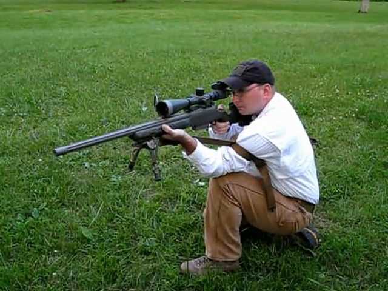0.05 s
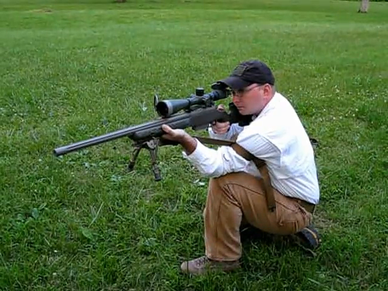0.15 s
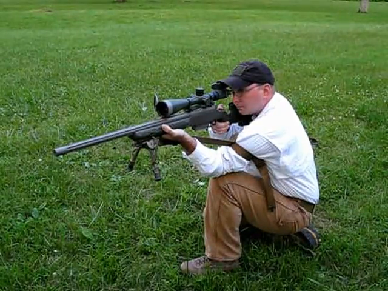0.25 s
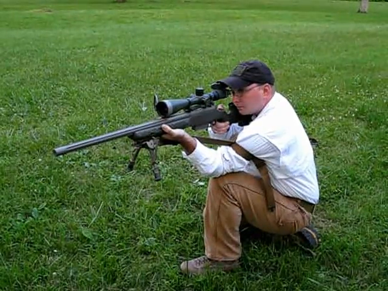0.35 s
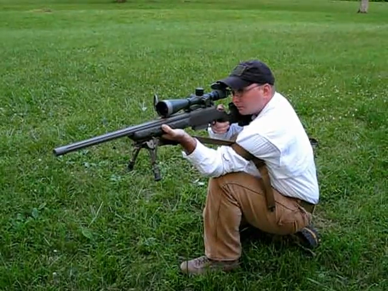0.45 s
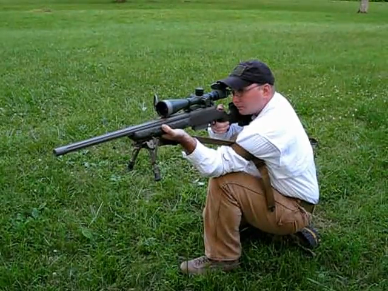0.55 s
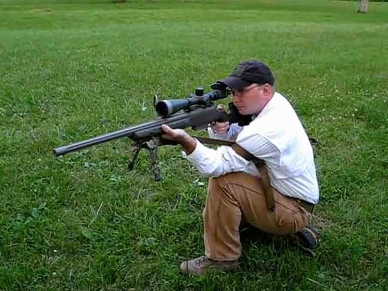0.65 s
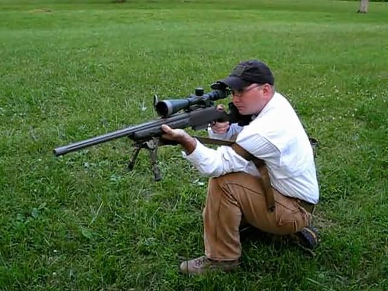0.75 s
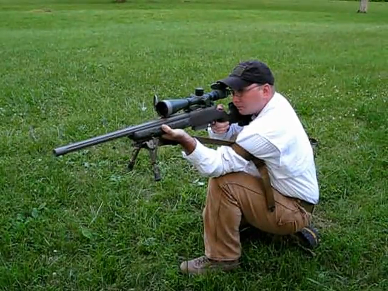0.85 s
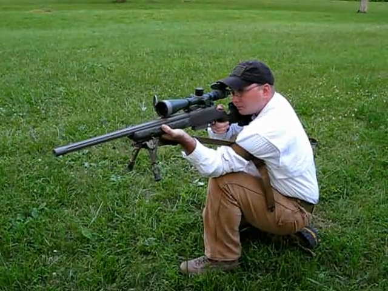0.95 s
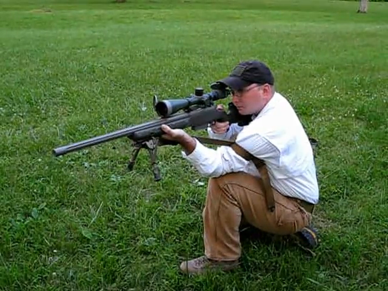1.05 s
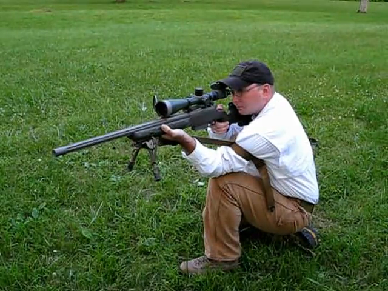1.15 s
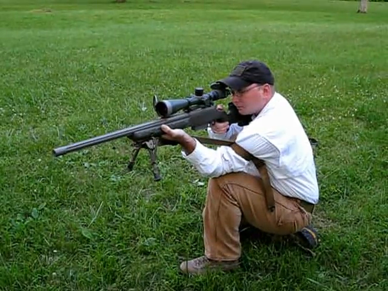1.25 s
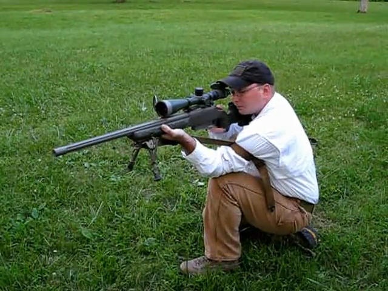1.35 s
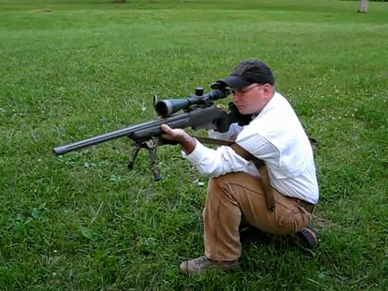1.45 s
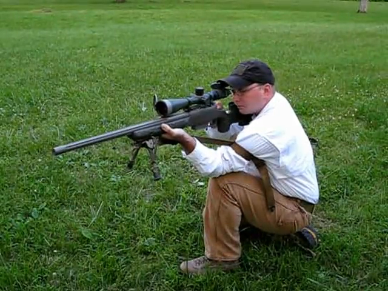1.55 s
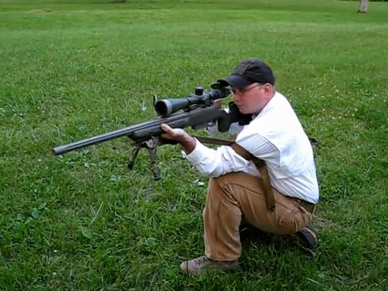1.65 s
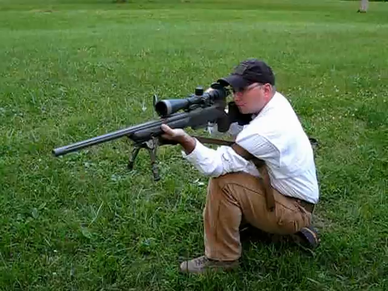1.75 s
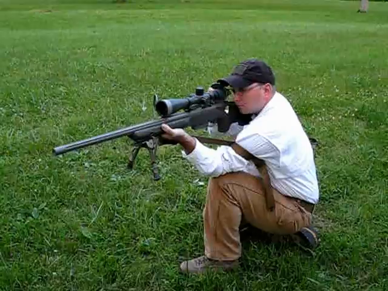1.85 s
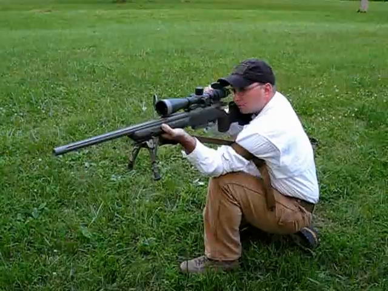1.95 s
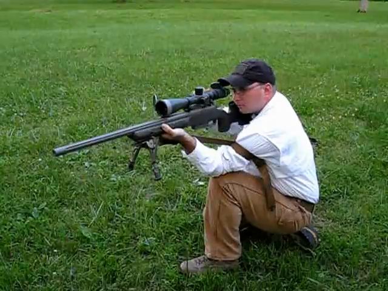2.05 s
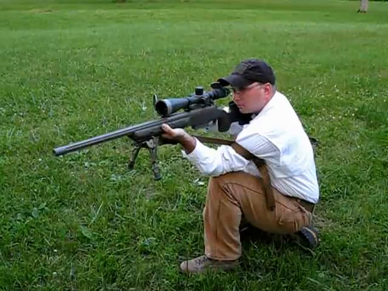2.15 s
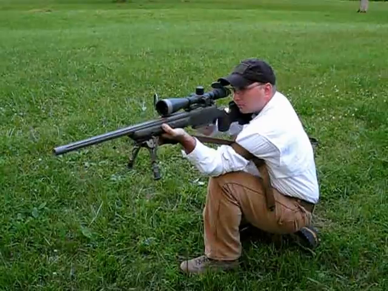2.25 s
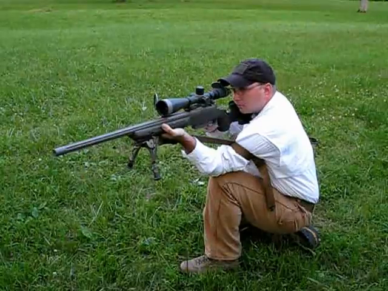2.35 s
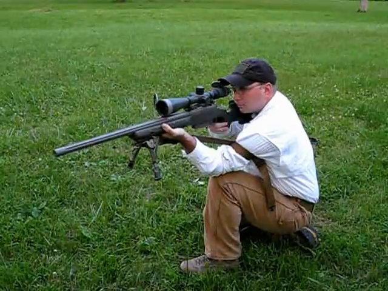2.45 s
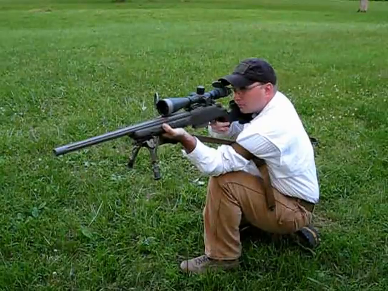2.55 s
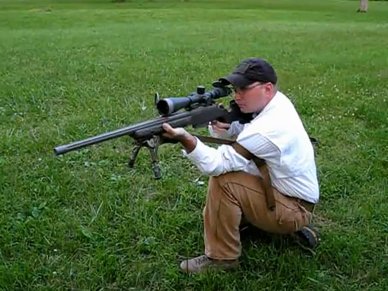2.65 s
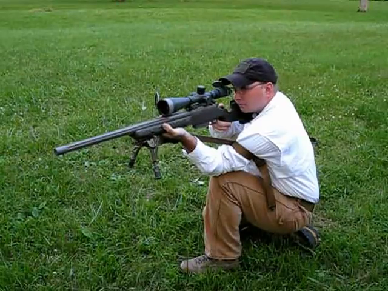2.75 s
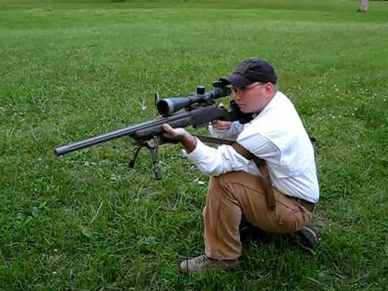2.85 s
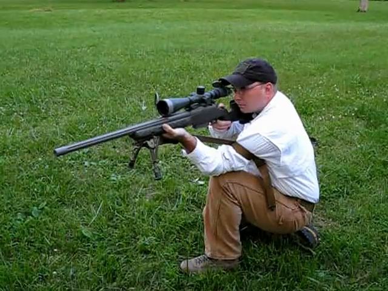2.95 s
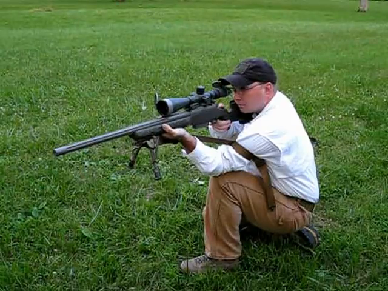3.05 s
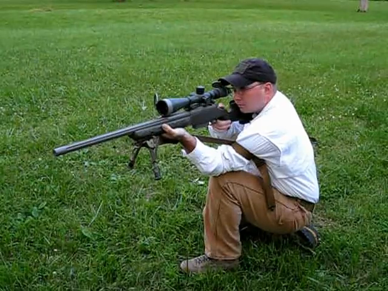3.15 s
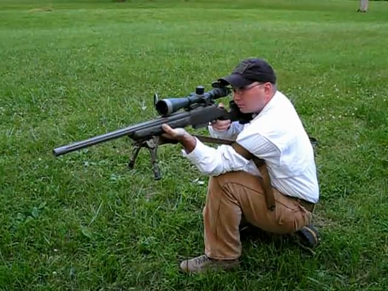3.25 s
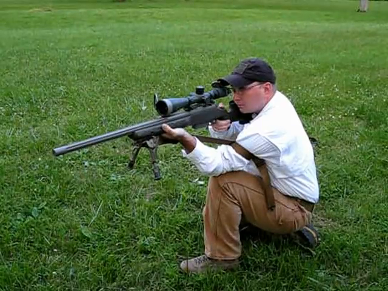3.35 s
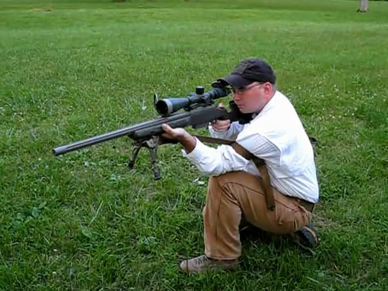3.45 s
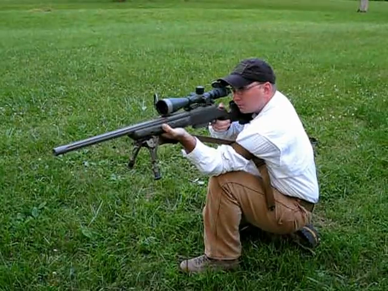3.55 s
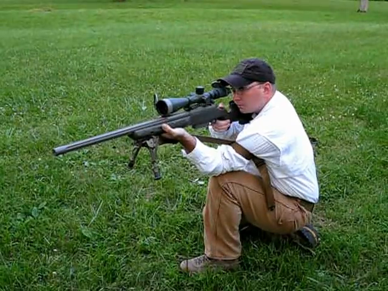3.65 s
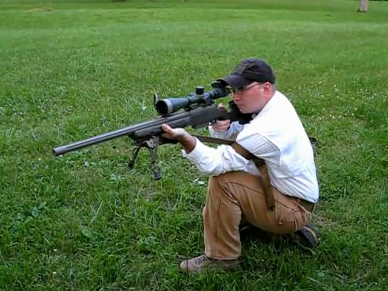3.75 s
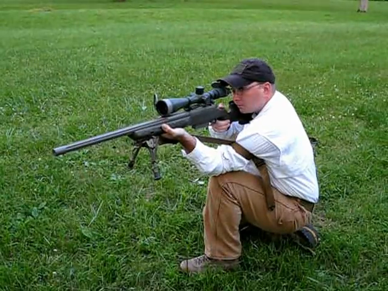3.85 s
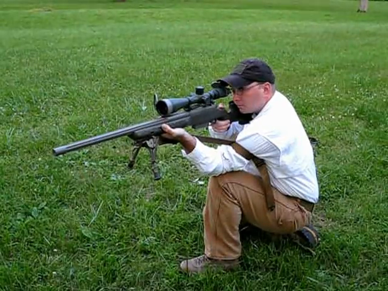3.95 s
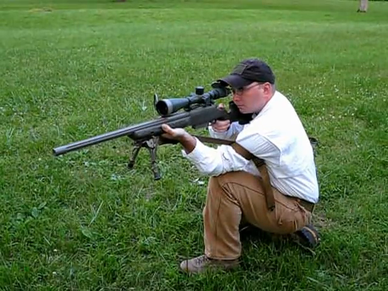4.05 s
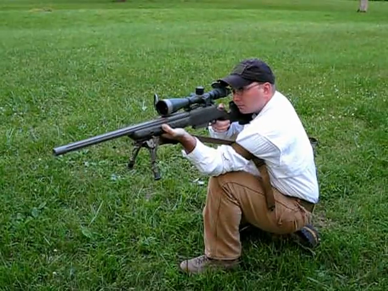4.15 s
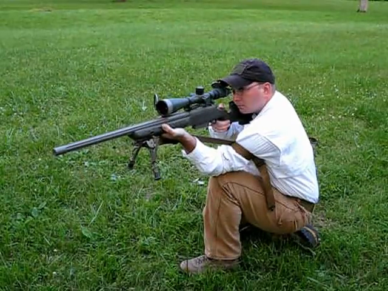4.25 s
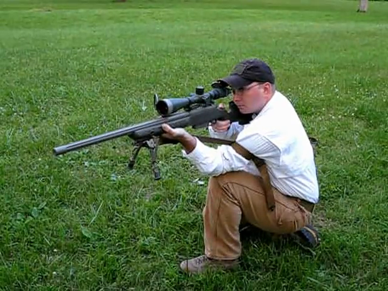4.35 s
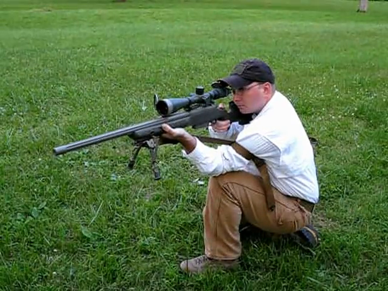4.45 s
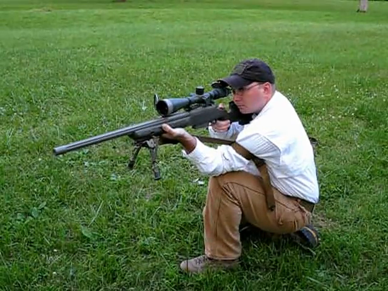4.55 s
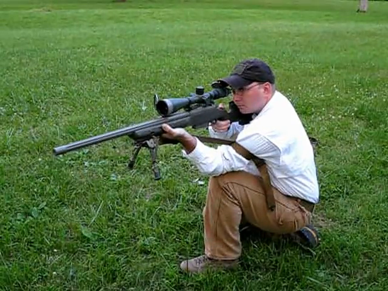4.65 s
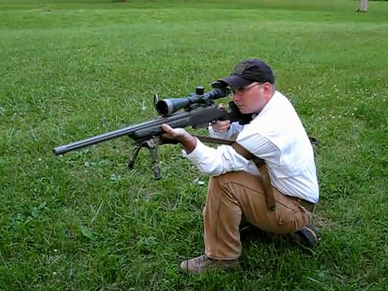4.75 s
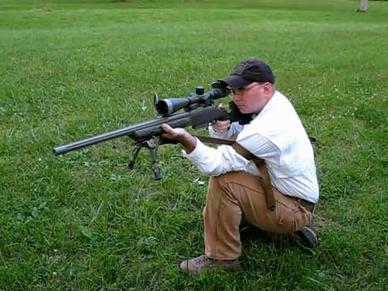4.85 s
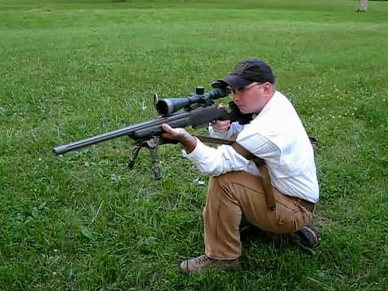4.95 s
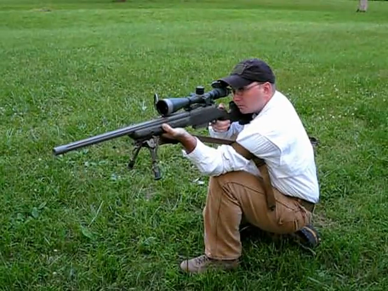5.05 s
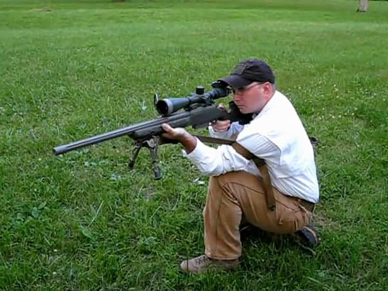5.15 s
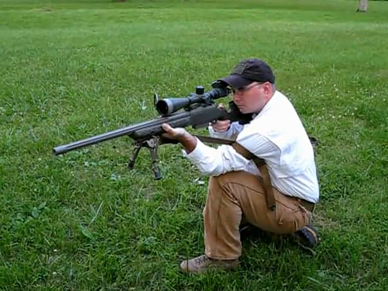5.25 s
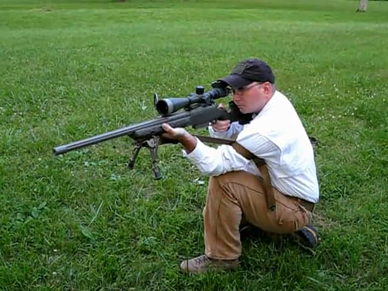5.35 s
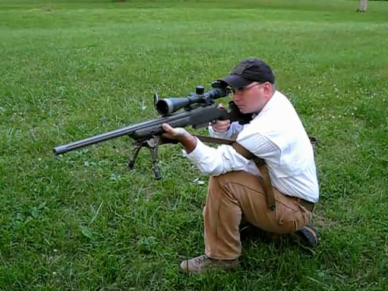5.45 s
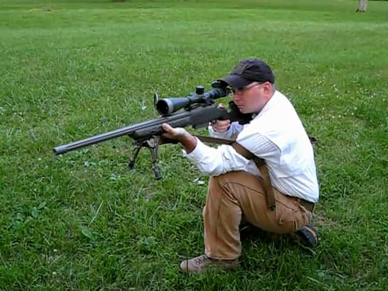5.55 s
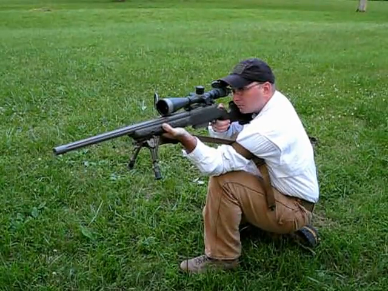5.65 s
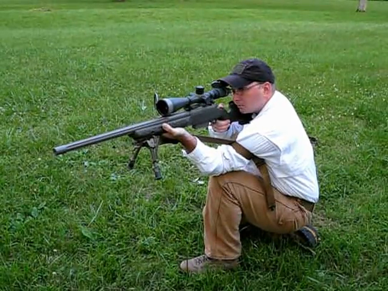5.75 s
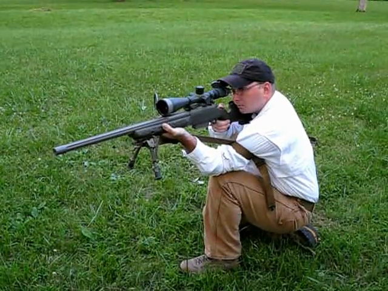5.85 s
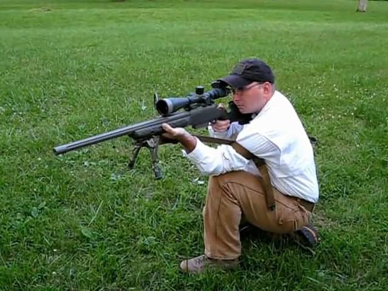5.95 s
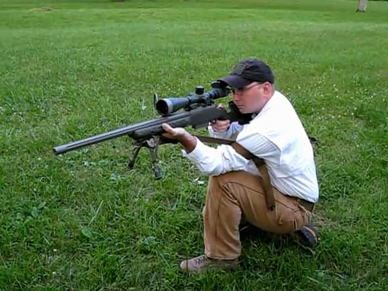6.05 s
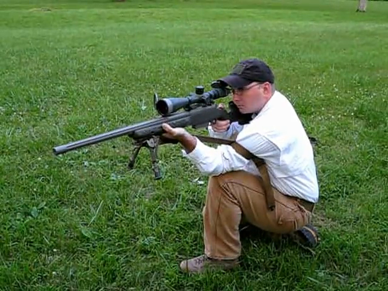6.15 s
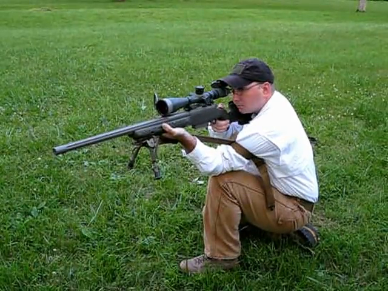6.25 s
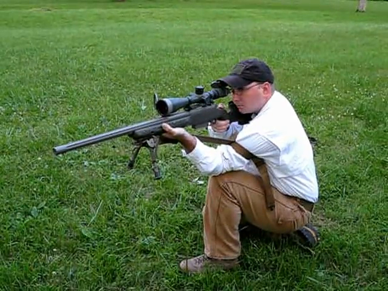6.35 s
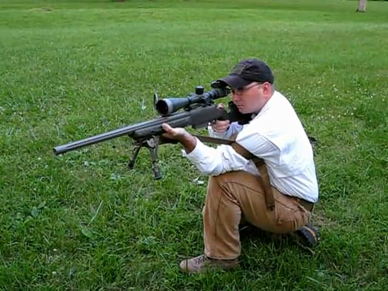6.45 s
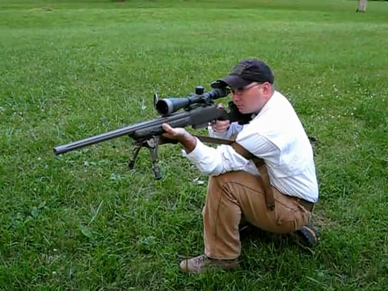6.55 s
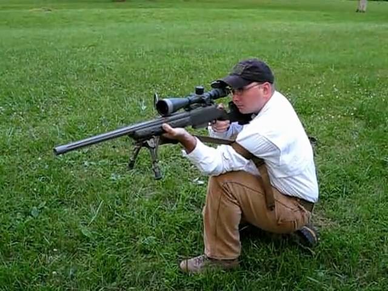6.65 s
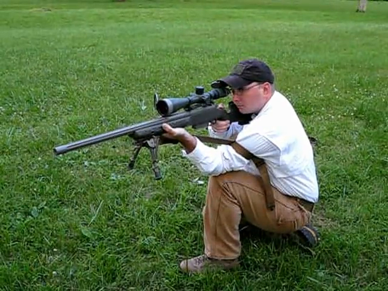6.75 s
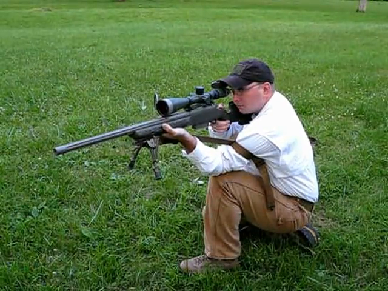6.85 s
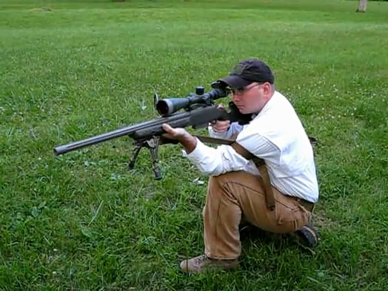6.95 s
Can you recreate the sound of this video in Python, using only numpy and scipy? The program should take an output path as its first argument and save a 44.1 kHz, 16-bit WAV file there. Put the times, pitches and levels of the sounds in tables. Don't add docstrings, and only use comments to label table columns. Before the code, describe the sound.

Outdoors on open grass, soft road hush, a thin high trill and faint bird whistles. At about one second a hard dry steel click snaps close to the microphone, with no gunshot. Shortly after, the bolt is lifted, drawn back, shoved forward and locked in a quick run of metallic clacks and short scrapes, with a faint echo from trees. Then only birds, road and a distant engine remain.

```python
import sys
import numpy as np
from scipy import signal
from scipy.fft import irfft
from scipy.io import wavfile
from scipy.ndimage import uniform_filter1d

SR = 44100
rng = np.random.default_rng(int(sys.argv[2]) if len(sys.argv) > 2 else 0)


def gain_from_db(level_db):
    decades = np.asarray(level_db, float) / 20
    return 10 ** decades


def bounce(signal):
    frames = np.transpose(np.atleast_2d(signal))
    limited = np.clip(frames, -1, 1)
    pcm = np.round(limited * 32767).astype(np.int16)
    wavfile.write(sys.argv[1], SR, pcm)


N = 308259


def evened(x):
    return x / np.sqrt(np.mean(x ** 2) + 1e-20)


def unit(x):
    return x / np.linalg.norm(x)


def smooth_noise(size):
    return evened(uniform_filter1d(rng.standard_normal(N), size=size))


def read(points, hz):
    f, value = np.transpose(points)
    return np.interp(np.log(hz + 1), np.log(f + 1), value)


def add(mix, s, sound):
    part = mix[round(s * SR):][:len(sound)]
    part += sound[:len(part)]


def coloured(points, patchy_db):
    real, imaginary, patches = rng.standard_normal((N // 512 + 6, 1025, 3)).T
    patches = uniform_filter1d(patches, size=20, axis=0)
    patches = evened(uniform_filter1d(patches, size=8, axis=1))
    spectrum_db = read(points, np.fft.rfftfreq(2048, 1 / SR))[:, None]
    z = (real + 1j * imaginary) * gain_from_db(spectrum_db + patchy_db * patches)
    return evened(signal.istft(z, nperseg=2048, noverlap=1536)[1][:N])


# frequency in Hz, density in dB per Hz.
ROAD_SPECTRUM = [(18, -44), (30, -33), (60, -10), (86, -4.5), (163, -7.5), (432, -8), (593, -7),
                 (814, -2.5), (1000, -1), (1890, -9.5), (2530, -11.5), (4070, -17.5), (12300, -26.5),
                 (15200, -33), (16500, -30)]
# time in seconds, level in dB.
ROAD_LEVEL = [(0, -46.5), (1.0, -47), (1.9, -44.5), (2.3, -46.5), (4.0, -47), (5.8, -47.5), (6.99, -48)]


def road():
    level_db = np.interp(np.arange(N) / SR, *np.transpose(ROAD_LEVEL)) + 2.5
    return gain_from_db(level_db) * coloured(ROAD_SPECTRUM, patchy_db=0.0)


ENGINE_ORDERS = [3, 4, 5, 6, 7, 8, 10, 12]
# level in dB before the shift, level in dB after.
ORDER_LEVELS = [(-30, -8), (-5.5, -3.5), (-18, -19), (0, -5), (-15, -22), (-21, -14), (-13, -12), (-9, -19)]
# time in seconds, level in dB.
ENGINE_LEVEL = [(0, -81), (.6, -62.5), (2.4, -65.5), (3.5, -57.5), (4.6, -57), (5.8, -63.5), (5.9, -68),
                (6.65, -58), (6.99, -58)]


def engine():
    idle_hz, climb_hz_per_s, climb_sag, shifted_hz = 86.4, 6.2, 0.19, 107.7
    shift_s, shift_length_s = 5.8, 0.1
    t = np.arange(N) / SR
    shifted = np.clip((t - shift_s) / shift_length_s, 0, 1)
    climb_hz = idle_hz + climb_hz_per_s * t - climb_sag * t ** 2
    turns = np.cumsum(climb_hz + (shifted_hz - climb_hz) * shifted) / SR / 6
    wobble = rng.standard_normal((len(ORDER_LEVELS), N // 441 + 1))
    wobble = evened(uniform_filter1d(wobble, size=25, axis=1))
    wobble_s = np.arange(wobble.shape[1]) / 100
    tones = np.zeros(N)
    for order, (before_db, after_db), drift in zip(ENGINE_ORDERS, ORDER_LEVELS, wobble):
        order_db = before_db + (after_db - before_db) * shifted + 2.0 * np.interp(t, wobble_s, drift)
        tones += gain_from_db(order_db) * np.sin(2 * np.pi * order * turns)
    return np.sqrt(2) * gain_from_db(np.interp(t, *np.transpose(ENGINE_LEVEL))) * tones


# start in seconds, length in seconds, centre in Hz, level in dB.
TRILL_RUNS = [(0.126, 0.27, 7400, -62.5), (.40, 0.15, 7350, -63.5), (0.601, 0.13, 7200, -65),
              (0.888, 0.14, 7500, -66), (3.03, 0.15, 7380, -61.5), (3.976, 0.13, 7400, -68),
              (4.35, 0.092, 7310, -66), (5.95, .1, 7410, -69)]


def trill(rate_hz=45, sweep_hz=900):
    out = np.zeros(N)
    uneven = smooth_noise(600)
    for s, length, hz, db in TRILL_RUNS:
        drift = uneven[round(s * SR):][:round(length * SR)]
        cycle = np.cumsum(rate_hz * (1 + 0.3 * drift)) / SR % 1
        pitch = hz + sweep_hz * (cycle - 0.5) + 150 * drift
        chips = np.sin(np.pi * cycle) ** 2 * np.sin(2 * np.pi * np.cumsum(pitch) / SR)
        add(out, s, gain_from_db(db) * evened(chips) * signal.windows.tukey(len(drift), 0.4))
    return out


def whistle(hz, db, edge_s=0.0055):
    shape = signal.windows.tukey(len(hz), min(2 * edge_s * SR / len(hz), 1))
    return np.sqrt(2) * gain_from_db(db) * shape * np.sin(2 * np.pi * np.cumsum(hz) / SR)


# start in seconds, length in seconds, settled pitch in Hz, drop in Hz, level in dB.
BIRD_HOOKS = [(.877, .026, 2400, 370, -52), (.97, .025, 2040, 150, -49), (1.374, 0.03, 2840, 151, -47.5),
              (1.91, 0.054, 2885, 500, -42.5), (1.946, .028, 2276, 150, -45.5),
              (2.629, 0.05, 2840, 290, -49.5), (2.676, 0.032, 2255, 333, -44.5),
              (2.735, 0.041, 2130, 300, -58), (3.546, 0.053, 2236, 300, -45.5),
              (3.701, 0.14, 2612, 220, -55.5), (4.2, 0.058, 2800, 418, -51.5),
              (5.072, 0.077, 2613, 100, -56.5), (5.18, 0.03, 2700, 438, -46.5),
              (6.304, 0.06, 2790, 302, -50.5), (6.381, 0.135, 2180, 375, -50),
              (6.942, 0.046, 2460, 170, -49)]
# start in seconds, length in seconds, start pitch in Hz, end pitch in Hz, level in dB.
BIRD_SLURS = [(0.745, 0.068, 3660, 2873, -45.5), (3.152, 0.029, 3550, 2550, -44.5),
              (4.261, 0.028, 2460, 2180, -48), (4.71, 0.036, 3450, 2410, -46.5),
              (5.225, 0.0345, 2475, 2200, -50), (6.215, 0.078, 3440, 2470, -46)]
# start in seconds, length in seconds, start pitch in Hz, end pitch in Hz, level in dB.
BIRD_TICK = (.351, .016, 5200, 8500, -57)
# start in seconds, length in seconds, start pitch in Hz, level in dB.
BIRD_FLICKS = [(.295, .043, 2880, -59), (.395, .04, 2620, -57), (0.847, 0.036, 2450, -55),
               (1.991, 0.04, 2470, -46), (2.578, 0.03, 2920, -50), (2.74, 0.043, 3200, -60),
               (3.534, 0.021, 2830, -47.5), (4.158, .025, 2895, -50), (5.15, 0.047, 2950, -51.5),
               (5.741, 0.026, 2398, -46), (5.84, 0.048, 2297, -51)]
# start in seconds, length in seconds, pitch in Hz, level in dB.
BIRD_HELD = [(.812, 0.026, 2890, -54), (.90, .03, 2070, -57), (.95, .035, 2700, -56),
             (1.416, 0.049, 2646, -52), (1.472, 0.044, 2597, -49), (3.665, 0.1, 3160, -51.5),
             (4.25, 0.02, 2490, -48), (4.3, .035, 2350, -54), (5.207, 0.025, 2500, -48),
             (5.665, .02, 2950, -59), (6.28, 0.019, 2477, -48), (6.901, 0.02, 3430, -53.5)]
# delay in seconds, level in dB.
BIRD_BRANCHES = [(0, 0), (.0027, -9), (.0064, -11), (.0113, -14)]


def songbird(flutter_db=1.3):
    settle_s, flick_hz_per_s = 0.0181, 5870
    shoulder, swell_db = 0.53, -9
    out = np.zeros(N)
    for s, length, hz, drop_hz, db in BIRD_HOOKS:
        t = np.arange(0, length, 1 / SR)
        add(out, s, whistle(hz + drop_hz * np.exp(-t / settle_s), db))
    for s, length, start_hz, end_hz, db in BIRD_SLURS:
        u = np.linspace(0, 1, round(length * SR))
        fall = u + shoulder * ((1 - np.cos(np.pi * u)) / 2 - u)
        add(out, s, whistle(start_hz + (end_hz - start_hz) * fall, db + swell_db * (1 - u) ** 2))
    s, length, start_hz, end_hz, db = BIRD_TICK
    add(out, s, whistle(np.linspace(start_hz, end_hz, round(length * SR)), db))
    for s, length, hz, db in BIRD_FLICKS:
        add(out, s, whistle(hz + flick_hz_per_s * np.arange(0, length, 1 / SR), db))
    for s, length, hz, db in BIRD_HELD:
        add(out, s, whistle(np.full(round(length * SR), hz), db))
    flutter = evened(uniform_filter1d(smooth_noise(300), size=300))
    taps = np.zeros(SR // 20)
    for s, db in BIRD_BRANCHES:
        taps[round(s * SR)] = gain_from_db(db)
    return signal.fftconvolve(out * gain_from_db(flutter_db * flutter), unit(taps))[:N]


# frequency in Hz, 60 dB decay time in seconds.
TREE_DECAY = [(500, 0.33), (2000, 0.9), (5000, 0.84), (10000, 0.49), (16000, 0.44)]


def trees(x, arrive, swell, longer=1):
    hz, t, z = signal.stft(rng.standard_normal(SR), SR, nperseg=256)
    late = np.maximum(t - arrive, 0)
    decay_s = longer * read(TREE_DECAY, hz)[:, None]
    z = z * (1 - np.exp(-late / swell)) * gain_from_db(-60 * late / decay_s)
    return signal.fftconvolve(x, unit(signal.istft(z, SR, nperseg=256)[1]))[:N]


def scatter(x, t60=0.042):
    t = np.arange(4000) / SR
    tail = rng.standard_normal(len(t)) * gain_from_db(-60 * t / t60) * (1 - np.exp(-t / 0.0008))
    tail = signal.lfilter(*signal.butter(1, 3500, fs=SR), tail)
    return signal.fftconvolve(x, unit(tail))[:N]


# start in seconds, hardest moment in seconds, end in seconds, level in dB.
BOLT_SLIDES = [
    (1.663, 1.724, 1.81, -38.5),
    (1.88, 1.92, 2.12, -43.5),
    (2.138, 2.201, 2.24, -39),
]
# frequency in Hz, density in dB per Hz.
SCRAPE_SPECTRUM = [(500, -31), (1500, -17), (3000, 0), (6000, 0.5), (10000, -2), (16000, -10)]


def bolt_scrape():
    t = np.arange(N) / SR
    stroke = np.zeros(N)
    for *times, db in BOLT_SLIDES:
        push_db = np.interp(t, times, [-9, 0, -24], left=-np.inf, right=-np.inf)
        stroke += gain_from_db(db + push_db)
    return stroke * coloured(SCRAPE_SPECTRUM, patchy_db=-1.5)


# start in seconds, pitch in Hz, level in dB, 60 dB
# decay time in seconds.
FREE_RINGS = [
    (1.0505, 1120, -15, .025),
    (1.646, 2250, -20, .03),
    (2.3035, 710, -22.5, 0.028),
    (2.128, 1230, -19, .03),
    (2.306, 2700, -32, .25),
    (2.3035, 1780, -14, .025),
    (2.3035, 7150, -25, .02),
]


def free_rings():
    out = np.zeros(N)
    t = np.arange(SR // 4) / SR
    for s, hz, db, t60 in FREE_RINGS:
        onset = 1 - np.exp(-t / 0.0005)
        add(out, s, gain_from_db(db - 60 * t / t60) * onset * np.sin(2 * np.pi * hz * t))
    return out


def ringing(parts, widen, phase):
    t = np.arange(1300) / SR
    ring = np.zeros(len(t))
    for (hz, width, db), turn in zip(parts, phase):
        width = width + 150
        decay = np.exp(-np.pi * widen * width * t)
        ring += gain_from_db(db) * np.sqrt(width) * decay * np.cos(2 * np.pi * (hz * t + turn))
    return unit(ring)


def blurred(parts, widen=0.91, between_db=-18):
    hz = np.fft.rfftfreq(1300, 1 / SR)
    power = sum(gain_from_db(2 * db) / (1 + (2 * (hz - f) / (widen * (width + 150))) ** 2) for f, width, db in parts)
    treble = hz ** 2 / (hz ** 2 + 1200 ** 2)
    return np.fft.fftshift(irfft(np.sqrt(power + gain_from_db(2 * between_db)) * treble))


def blow_sound(ms, treble_db, parts, top_hz):
    t = np.arange(1300) / SR
    low = signal.butter(2, 6000, fs=SR, output="sos")
    thin = signal.butter(1, 900, "high", fs=SR, output="sos")
    small = signal.butter(4, 720, "high", fs=SR, output="sos")
    noise, phase = rng.standard_normal(len(t)), rng.random(len(parts))
    u = t / (ms / 1000)
    contact = noise * (1 - np.exp(-u / 0.2)) * np.exp(-1.5 * u ** 1.3)
    direct = signal.fftconvolve(contact, ringing(parts, 0.78, phase))[:len(t)]
    direct = signal.sosfilt(small, direct + signal.sosfilt(thin, contact))
    direct = signal.sosfilt(signal.butter(3, top_hz, fs=SR, output="sos"), direct)
    body = signal.sosfilt(low, direct)
    return unit(body + gain_from_db(treble_db - 1.5) * (direct - body))


def step(near, away, blows, parts, away_parts, echo_db, push_db, top_hz):
    energy = 0
    for s, db, ms, treble_db in blows:
        size = gain_from_db(db) * np.sqrt(ms / 1000 * SR)
        energy += size ** 2
        add(near, s, size * blow_sound(ms, treble_db, parts, top_hz))
    hardest = max(blows, key=lambda blow: blow[1])[0]
    add(away, hardest, np.sqrt(energy) * gain_from_db(echo_db) * unit(blurred(away_parts)))
    jolt = np.arange(1300) / SR / 0.00025
    add(near, hardest, gain_from_db(push_db) * jolt * np.exp(1 - jolt))


# frequency in Hz, width in Hz, level in dB.
PIN_FALLS = [
    [(1.0472, -14, 2.9, 11), (1.0492, -2.5, 1.86, -4), (1.0512, 4, 1.27, 3), (1.0555, -21, 2.4, 3), (1.060, -23, 3.2, -4), (1.065, -25, 11, 0)],
    [(1864, 61, 1), (3460, 120, 5.5), (4800, 200, -16), (5370, 230, 4.5), (7030, 180, -5), (8130, 57, -5), (11280, 1000, -4), (13850, 370, 3.5), (15200, 150, -15)],
]
BOLT_LIFTED = [
    [(1.6393, -21, 1, -20), (1.6402, -12, 2.6, -16), (1.6432, -20, 1.4, -18), (1.6455, -9, 3.2, -6.5), (1.6512, -12, 3.1, 12), (1.654, -17, 2.2, -3), (1.6562, -18, 2.6, -3), ],
    [(1720, 26, -9), (2800, 500, 0.5), (5220, 130, -5.5), (7200, 130, -11), (8300, 150, -13), (9500, 330, -13), (11040, 140, -11), (12900, 330, -8), (14800, 120, -21)],
]
BOLT_DRAWN = [
    [(1.7135, -15, 1.96, -0.5), (1.717, -22, 2, -10), (1.720, -28, 1.4, -14), (1.7228, -34, 4.2, -20), (1.740, -32.5, 7.2, -12), (1.7445, -34, 4.2, -18), (1.7648, -35, 5.5, -18), ],
    [(1670, 67, -4), (3080, 330, 3.5), (4630, 260, 2), (7260, 210, -1), (9500, 160, -14), (10200, 330, -6), (13000, 210, -21), (14500, 150, -18)],
]
BOLT_STOPPED = [
    [(1.854, -16.5, 4.3, 3.5), (1.8556, -5, 0.71, -1.5), (1.8568, -13, 1.7, -6), (1.864, -29.5, 10, -4), (1.8822, -28, 2.1, 11), (1.885, -30, 3.8, -7), (1.8975, -34, 4.3, -5), (1.9945, -36.5, 3.35, -19)],
    [(1130, 340, 3.5), (2720, 210, 2), (4200, 130, -8), (5050, 250, -0.5), (6430, 220, -10), (8700, 77, -15), (10860, 170, -3), (14500, 240, 0.5), (13800, 340, -4)],
]
BOLT_PUSHED = [
    [(2.0855, -41, 4.5, -7), (2.0925, -37, 3.0, 0), (2.0982, -31, 6.6, -8), (2.1045, -36, 3.5, -15), (2.119, -35, 5.5, -30), (2.1264, -16, 3, 3), (2.1276, -0.5, 2.23, -3.5), (2.1322, -7, 0.73, -14), (2.136, -32, 4.4, -7)],
    [(2720, 690, 10), (3270, 220, 4.5), (3930, 120, 7), (4900, 96, -2), (6000, 240, 7), (6960, 880, 13.5), (10000, 630, 6), (12270, 290, 7), (13500, 370, -15)],
]
BOLT_CLOSED = [
    [(2.2112, -28, 3.3, -13), (2.2136, -16, 3, -18), (2.2198, -22.5, 2.3, -18), (2.2226, -19.5, 1.8, -15), (2.2252, -22, 1.2, -17), (2.228, -32, 2.8, -22), (2.2468, -28, 2.6, -10), (2.2522, -16, 1.44, -18)],
    [(1790, 47, -1), (2070, 76, -1.5), (2600, 110, 3.5), (3030, 28, 4.5), (4850, 78, -0.5), (5950, 49, -5), (8810, 46, -24), (10200, 48, -24)],
]
BOLT_LOCKED = [
    [(2.3022, -27, .8, -10), (2.3029, -3, 1.4, -2), (2.3042, -3.5, .8, -5), (2.3062, -19, 2.4, -8), (2.310, -38, 8, 6)],
    [(894, 230, -6), (2750, 270, 0), (3370, 320, -2), (4080, 180, -4), (5210, 180, -2), (7240, 280, -5), (8650, 320, -19), (10100, 170, -17), (13100, 230, -15)],
]
# frequency in Hz, width in Hz, level in dB.
PIN_TO_TREES = [(2700, 400, -10), (3900, 340, -1), (5270, 500, -4.5), (7100, 700, -9), (8260, 700, -8.5),
                (10850, 900, -3), (13900, 500, -6)]
LOCK_TO_TREES = [(2650, 280, -4), (3720, 500, -5), (5450, 250, 0), (7200, 770, -6), (10500, 1600, -9)]
# ring in Hz, ring level in dB, dull push level in dB.
STOCK_RINGS = [
    (1210, 1, -42),
    (840, -8.5, -43),
    (900, 1, -39),
    (1090, -25, -22),
    (1143, 1.5, -19),
    (740, -5.5, -35),
    (880, -12, -56),
]
ECHO_SHARE = [-20, -30, -25, -26.5, -30, -23, -26.5]
SMEAR_SHARE = [-19, -20, -17, -16, -19, -17, -24]
STEP_TOP = [19000, 14500, 12500, 19000, 12500, 11500, 19000]


def rifle():
    near, away, loose = np.zeros((3, N))
    steps = PIN_FALLS, BOLT_LIFTED, BOLT_DRAWN, BOLT_STOPPED, BOLT_PUSHED, BOLT_CLOSED, BOLT_LOCKED
    to_trees = [PIN_TO_TREES] + [parts for blows, parts in steps[1:-1]] + [LOCK_TO_TREES]
    settings = zip(steps, STOCK_RINGS, to_trees, ECHO_SHARE, STEP_TOP, SMEAR_SHARE)
    for (blows, parts), (hz, db, push_db), sent, echo_db, top_hz, smear_db in settings:
        one = np.zeros(N)
        stock = (hz, 300, db)
        step(one, away, blows, list(parts) + [stock], sent, echo_db, push_db, top_hz)
        near += one
        loose += gain_from_db(smear_db) * one
    return near + free_rings() + scatter(loose) + bolt_scrape(), away


def scene():
    gun, away = rifle()
    bird, chips = songbird(), trill()
    far = bird + gain_from_db(-3.0) * trees(bird, arrive=0.0029, swell=0.003, longer=0.95)
    far += 1.04 * chips + trees(chips, arrive=0.0034, swell=0.0053)
    gun_echo = trees(away, arrive=0.0057, swell=0.018)
    return (gun + gun_echo + far + road() + engine())[None]


def low_pass(x):
    return signal.sosfilt(signal.butter(12, 17120, fs=SR, output="sos"), x)


def record(dry):
    power_db = 10 * np.log10(abs(uniform_filter1d(dry[0] ** 2, size=200)) + 1e-12)
    fall = np.arange(N) * 74.0 / SR
    held_db = np.maximum.accumulate(power_db + fall) - fall
    over_db = np.maximum(held_db + 6.5, 0)
    lag = np.exp(-1 / (0.015 * SR))
    ducked = dry / gain_from_db(2.34 * signal.lfilter([1 - lag], [1, -lag], over_db))
    squashed = ducked / (1 + (ducked / 0.76) ** 4) ** 0.25
    top_cut = signal.firwin(255, 15650, window=("kaiser", 8), fs=SR)
    squashed = signal.oaconvolve(squashed, top_cut[None], "same")
    squashed = signal.sosfilt(signal.butter(2, 60, "high", fs=SR, output="sos"), squashed)
    return low_pass(squashed)


dry = scene()
out = record(dry)
bounce(out)
```